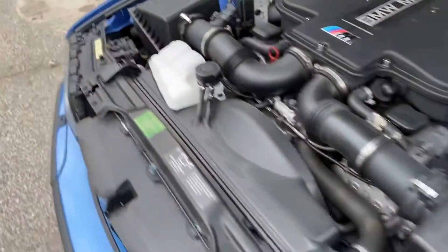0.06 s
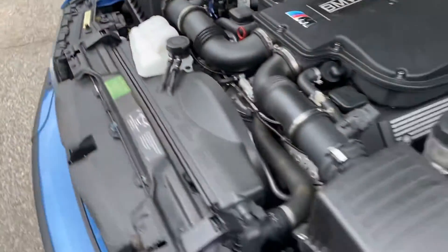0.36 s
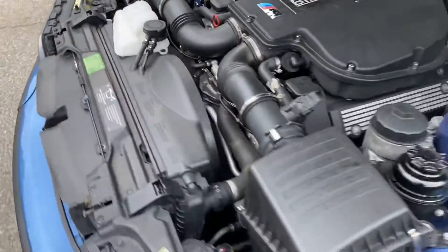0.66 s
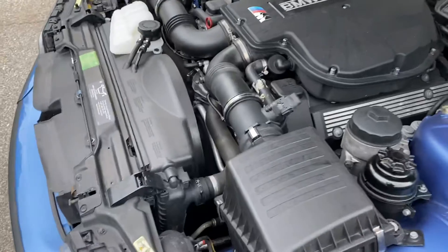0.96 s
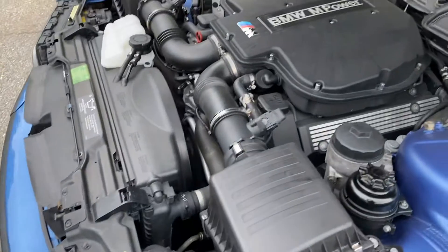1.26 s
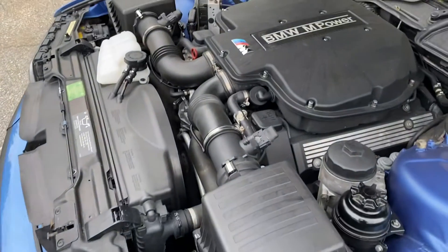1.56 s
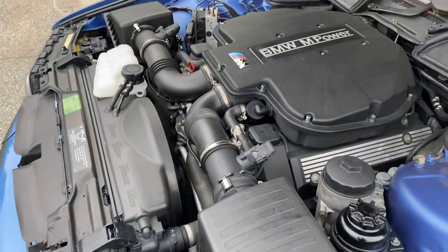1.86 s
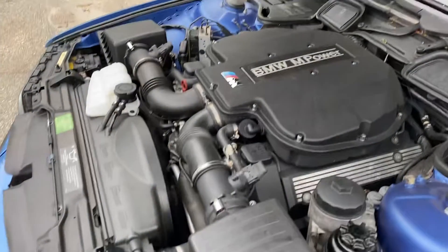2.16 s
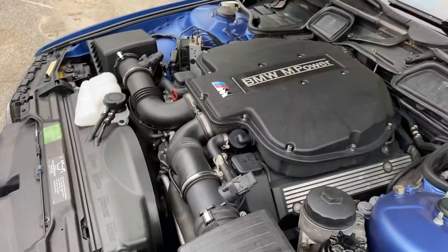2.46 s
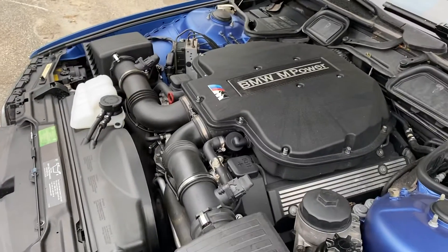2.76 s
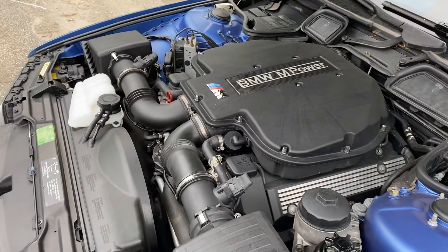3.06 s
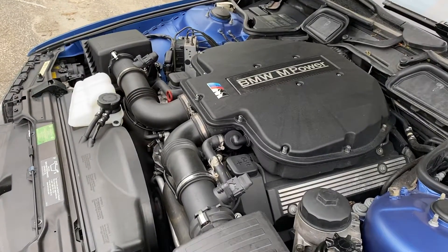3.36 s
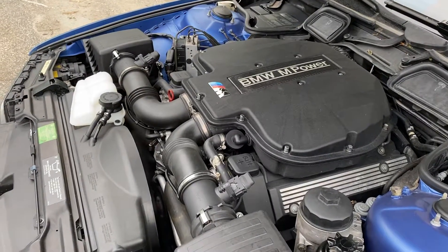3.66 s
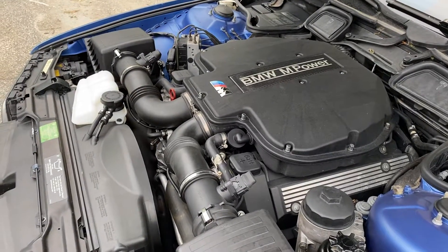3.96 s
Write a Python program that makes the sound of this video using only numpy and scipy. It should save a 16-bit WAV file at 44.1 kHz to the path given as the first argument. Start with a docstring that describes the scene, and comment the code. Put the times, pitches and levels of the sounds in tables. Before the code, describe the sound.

A car engine idles with an even, booming throb, light valve clatter and thin, high belt squeaks. The microphone starts near the rushing radiator fan, then drifts above the open engine bay, where the ticking comes forward slightly.

```python
"""A V8 engine idles under an open hood while the microphone drifts from the radiator to above the block.
The firing note booms and throbs; valve gear and injectors knock at set crank angles through block and
covers. Fan air and belt whirr fall back as the microphone moves away. A belt pulley squeaks high up
once a turn over a fluttering bearing hiss. Underneath, the timing chain whines faintly, an electric
accessory hums, and pipes and brackets ring with the shaking."""
import sys
import numpy as np
from scipy import signal
from scipy.fft import rfft, irfft
from scipy.io import wavfile

SR = 44100
rng = np.random.default_rng(int(sys.argv[2]) if len(sys.argv) > 2 else 0)


def persist_wave(psi):
    """Save psi, clipped to +-1, as 16-bit WAV."""
    counts = np.round(np.clip(psi, -1, 1) * 32767).astype(np.int16)
    wavfile.write(sys.argv[1], SR, np.atleast_2d(counts).T)


N = 176400
TIME = np.arange(N) / SR
FREQS = np.maximum(np.arange(N // 2 + 1) * SR / N, 1)

# Idle speed. Each row: time in seconds, firings per second.
FIRING_RATE = [(0.0, 73.93), (0.3, 73.27), (0.5, 74.1), (0.75, 75.41), (1.1, 73.82), (1.35, 73.6),
               (1.6, 72.56), (1.85, 74.16), (2.15, 74.79), (2.45, 74.4), (2.65, 74.56), (3.05, 74.2),
               (3.25, 73.45), (3.48, 72.33), (3.7, 74.27), (3.85, 74.99), (4.0, 74.49)]
# The microphone move. Each row: time in seconds, closeness to the radiator from 0 to 1.
AT_RADIATOR = [(0, 0.99), (.3, 0.81), (.7, 0.17), (1.1, 0.24), (1.6, 0.08), (4, 0.03)]
# Stereo image of the bay. Each row: frequency in Hz, left-right likeness from 0 to 1.
BAY_LIKENESS = [(30, 0.7), (150, 1), (350, 1), (700, 0.68), (1400, 0.52), (2000, 0.4), (4000, 0.3),
                (8000, 0.5), (15000, 0.8)]
# Body of the boom. Each row: multiple of the cycle rate, level in dB, change at the radiator in dB.
BOOM_ORDERS = [(8, -8, -4), (9, -34.5, -7), (10, -23, 5.5), (16, -25.5, 7.5)]
# Weak tones from unequal cylinders. Each row: multiple of the cycle rate, level in dB.
UNEVEN_ORDERS = [(5, -39.5), (6, -35.5), (11, -32.5), (12, -33.5), (13, -32.5), (14, -31.5), (15, -44.5),
                 (17, -41.5), (19, -42), (21, -38.5), (23, -40), (24, -36), (25, -45), (26, -40.5),
                 (27, -46), (29, -46), (32, -45.5), (35, -47.5), (37, -44.5), (39, -49), (45, -47),
                 (48, -44.5), (50, -48)]
# Each part's rhythm over one cycle. Each row: crank angle in degrees, relative strength in dB.
BLOCK_KNOCKS = [(20, -4), (52, 8.5), (155, -8), (245, 10.5), (285, -2), (302, 2), (332, 8), (385, -3),
                (430, -5), (472, -1), (490, 10), (565, 3), (600, 0.5), (655, 6), (708, 0.5)]
COVER_KNOCKS = [(10, -0.5), (46, 1.5), (68, -8), (135, -5), (195, 2), (265, -2), (305, -3.5), (436, 2.5),
                (485, -4.5), (528, -4), (570, -0.5), (622, -9), (658, -3.5), (688, 1)]
VALVE_KNOCKS = [(5, 1), (40, 2), (126, -12), (148, 4.5), (185, -15), (212, -2), (285, 0), (345, -4),
                (405, 5.5), (432, -5), (485, -2), (510, -18), (628, 3), (672, -10)]
INJECTOR_TICKS = [(15, -3), (88, 4), (108, 7), (130, 0), (178, 3), (230, -4), (285, 4), (315, -4),
                  (425, -6), (628, -6)]
# Tone colour of each noisy layer. Each row: frequency in Hz, relative level in dB.
BLOCK_EQ = [(110, -11), (170, -0.5), (235, -2.5), (275, -3.5), (345, -5), (400, -8), (450, -1.5),
            (510, -20), (700, -30)]
COVER_EQ = [(350, -24), (500, -1.5), (620, -3), (705, -2), (770, -2.5), (900, -3.5), (1050, -6.5),
            (1500, -36)]
VALVE_EQ = [(700, -3), (1000, -6.5), (1200, 1.5), (1320, -0.5), (1540, 1), (1650, -2), (1770, 0),
            (2000, -2), (2300, -4), (2800, -11.5), (4000, -24)]
INJECTOR_EQ = [(1800, -24), (2500, 2), (3300, 2), (4300, 2), (5100, -2.5), (5450, -3), (5780, -3.5),
               (6200, -3), (7060, -1), (7800, -14.5), (9500, -11.5), (15000, -10)]
FAN_EQ = [(14, 8), (45, -15), (150, 6.5), (260, -8), (340, 6), (430, 1), (520, -9.5), (850, -6),
          (1060, -10), (1260, 0), (1600, -13.5), (2120, -7.5), (2600, -13), (8000, -31.5)]
WHIRR_EQ = [(900, -27), (1010, -3.5), (1070, 0), (1130, -5), (1230, -40)]
PULLEY_EQ = [(7000, -31), (10000, -20), (10800, -2.5), (11400, 5), (12100, -4), (12900, -7), (14000, 2.5),
             (14700, -5), (15600, -8), (17000, -16)]
BEARING_EQ = [(4000, -7), (6900, -28), (7900, 1), (8450, 6), (9000, -10), (10000, -3.5), (11500, -8),
              (12600, -3.5), (14100, 5.5), (14800, 4.5), (15600, 4), (17000, -11)]
SIZZLE_EQ = [(13500, -29), (14700, -8), (15550, 0), (17000, -2)]
# Belt whirr and sizzle, loudest at the engine front. Each row: time in seconds, level in dB.
WHIRR_FADER = [(0, -41), (.3, -37.5), (.7, -40), (.95, -41), (1.3, -55), (1.7, -66), (4, -67)]
SIZZLE_FADER = [(0, -39), (.5, -33), (.8, -51), (4, -44)]
# Timing chain whine. Each row: multiple of the tooth rate, level in dB, change at the radiator in dB.
CHAIN_HARMONICS = [(1, -52.5, 4), (2, -45.5, -11), (3, -51, 9), (4, -50.5, 0), (5, -44, -9), (6, -50, 4)]
# Hum and whine of an electric accessory. Each row: pitch in Hz, level in dB.
ACCESSORY_TONES = [(301.5, -44.5), (602.9, -44.5), (1205.8, -53), (2110.3, -50)]
# Pipes and brackets. Each row: pitch in Hz, width in Hz, level in dB, change at the radiator in dB.
BRACKET_RINGS = [(677, 18, -48, -8), (709, 26, -44.5, -4.5), (821, 41, -49.5, -11), (1188, 62, -46, 4.5),
                 (1398, 28, -52.5, 3), (1526, 34, -46, -16), (1584, 42, -45, -23), (1740, 24, -49, -16),
                 (1825, 27, -46, -4), (1905, 20, -52.5, 5), (1962, 47, -46.5, -4), (2383, 30, -54.5, -2),
                 (3100, 110, -53.5, -13), (4850, 58, -57, 2), (5180, 97, -53.5, -5), (5740, 64, -55.5, -6),
                 (7010, 110, -59.5, 9), (7540, 100, -54, -4)]
# Louder squeaks of the belt on some turns, same shape as the rest. Each row: peak time in seconds, level in dB,
# pitch in Hz.
BELT_CHIRPS = [(.047, -27, 11450), (.121, -28.5, 11100), (.181, -26.5, 11500), (.334, -35, 12300),
               (.388, -34, 11100), (.465, -28.5, 11300), (.54, -34, 11000), (.596, -34, 11300),
               (.67, -30, 11400), (.743, -31, 11100), (.95, -30, 11300), (1.095, -36, 11900),
               (1.306, -31, 11400), (1.434, -33, 10800), (1.517, -35, 11400), (1.652, -32, 10900),
               (1.723, -29, 11300), (1.853, -33, 11200), (1.929, -30, 11300), (2.057, -32, 11500),
               (2.135, -31, 11400), (2.185, -33, 11400), (2.391, -33, 11400), (2.412, -33, 10900),
               (2.543, -33, 11300), (2.599, -34, 11400), (2.749, -35, 11500), (2.823, -33, 11500),
               (2.895, -35, 11600), (3.1, -33, 11500), (3.312, -34, 11300), (3.597, -28, 11480),
               (3.727, -36, 11200), (3.803, -30, 11800), (3.93, -33, 11000)]

CYLINDERS, CHAIN_TEETH = 8, 19
PULLEY_RATIO, BEARING_RATIO = .777, 2.879  # turns per crank turn
PULLEY_RUB_TURN, BEARING_RUB_TURN = .63, .55  # where in its turn each rubs hardest


def from_db(db):
    """Decibels to gain."""
    return 10 ** (np.asarray(db) / 20)


def unit_rms(x):
    """Scale to unit power."""
    return x / np.sqrt(np.mean(x ** 2) + 1e-20)


def automation(rows):
    """A control curve at every sample."""
    return np.interp(TIME, *np.transpose(rows))


def over_hz(points):
    """A curve read along log frequency."""
    hz, value = np.transpose(points)
    return np.interp(np.log(FREQS), np.log(hz), value)


def colour(x, eq):
    """Shape with an EQ curve that rolls off beyond its ends; unit power."""
    skirts = 1 / (1 + (eq[0][0] / FREQS) ** 2) / (1 + (FREQS / eq[-1][0] / 2) ** 2)
    return unit_rms(irfft(rfft(x) * from_db(over_hz(eq)) * skirts, N))


def drift(rate_hz):
    """A smooth random wobble of unit power, mostly slower than rate_hz."""
    spectrum = rfft(rng.standard_normal(N)) / (1 + (FREQS / rate_hz) ** 2)
    return unit_rms(irfft(spectrum * (FREQS > 1), N))


def pan(db):
    """Stereo gains; positive dB leans left."""
    return from_db(np.array([[.5], [-.5]]) * db)


def spread(mid, side):
    """The stereo image of the bay: tight in the bass, wider in the treble."""
    alike = over_hz(BAY_LIKENESS)
    centre = np.sqrt(1 + alike) * rfft(mid)
    edges = np.sqrt(1 - alike) * rfft(side) * np.array([[1], [-1]])
    return irfft(centre + edges, N)


def bay_noise():
    """Noise as wide as the engine bay."""
    return spread(*rng.standard_normal((2, N)))


def firing_boom(cycle, radiator, ripple_rad=.08, left_lag_rad=.22):
    """The firing note and its octave, throbbing neighbours, and wavering tones of unequal cylinders."""
    angle = 2 * np.pi * (cycle + 225 / 720)  # a lead of 225 crank degrees
    ripple = ripple_rad * np.sin(angle)  # the note hurries and lags once a cycle
    angle = angle + (ripple + left_lag_rad * np.array([[-.5], [.5]])) / CYLINDERS
    out = 0
    for order, db, change_db in BOOM_ORDERS:
        place = pan(-2.3 if order < 1.5 * CYLINDERS else 1.6)  # lows right, octave left
        out = out - place * from_db(db + change_db * radiator) * np.cos(order * angle)
    for order, db in UNEVEN_ORDERS:
        out = out + from_db(db + 1.57 * drift(2.2)) * np.cos(order * angle + 2 * np.pi * rng.random())
    return out


def knocks(cycle, pattern, eq, decay_s, wash, repeat, scatter_db):
    """Each contact sets off a short dense ring, partly the same every cycle, over a steady wash."""
    deg, db = np.transpose(pattern)
    hit_cycles = np.arange(-1, int(cycle[-1]) + 1)[:, None] + deg / 720
    starts = np.interp(hit_cycles, cycle, np.arange(N), left=-1, right=-1).astype(int)
    power = from_db(db + scatter_db * rng.standard_normal(hit_cycles.shape)) ** 2
    hits = np.bincount(starts[starts >= 0], power[starts >= 0], N)
    ringing = signal.lfilter([1], [1, -np.exp(-2 / (decay_s * SR))], hits)
    envelope = np.sqrt(ringing / ringing.mean() + wash)
    grains = rng.standard_normal((2, 4096))
    looped = np.array([unit_rms(np.interp(cycle % 1 * len(g), np.arange(len(g)), g)) for g in grains])
    texture = np.sqrt(repeat / 2) * looped + np.sqrt(1 - repeat) * rng.standard_normal((2, N))
    return colour(spread(*(texture * envelope)), eq)


def clatter(cycle, radiator):
    """Block, covers, valves and injectors knock; at the radiator the block comes forward in the mix."""
    block = knocks(cycle, BLOCK_KNOCKS, BLOCK_EQ, decay_s=.0081, wash=.22, repeat=.68, scatter_db=1.5)
    cover = knocks(cycle, COVER_KNOCKS, COVER_EQ, decay_s=.0043, wash=1, repeat=.3, scatter_db=.5)
    valves = knocks(cycle, VALVE_KNOCKS, VALVE_EQ, decay_s=.0069, wash=1.2, repeat=.2, scatter_db=.5)
    ticks = knocks(cycle, INJECTOR_TICKS, INJECTOR_EQ,
                   decay_s=.0063, wash=6.5, repeat=.18, scatter_db=2.5)
    block *= from_db(-37.5 + 2 * radiator)
    cover *= from_db(-34 - 3.5 * radiator)
    valves *= from_db(-35 - 3.7 * radiator)
    return pan(1) * (block + cover + valves) + pan(2) * from_db(-39) * ticks


def fan(radiator):
    """Air rushes through the radiator fan, louder close to it."""
    return from_db(-40.5 + 10.9 * radiator) * colour(bay_noise(), FAN_EQ)


def belt_whirr():
    """A narrow band of whirr from the belt drive, heard while the microphone passes the engine front."""
    return from_db(automation(WHIRR_FADER)) * colour(bay_noise(), WHIRR_EQ)


def from_belt(source, left_lag_s=.0001844):
    """Sound from the belt reaches the left microphone later."""
    return irfft(rfft(source) * np.exp(-2j * np.pi * FREQS * np.array([[left_lag_s], [0]])), N)


def slips(per_s=140, decay_s=.005, steady_rub=2.4):
    """Envelope of tiny random belt slips: each bites at once and dies away, over a steady rub."""
    starts = (rng.random(N) < per_s / SR) * rng.uniform(.2, 1, N)
    power = signal.lfilter([1], [1, -np.exp(-2 / (decay_s * SR))], starts + 1e-18)
    return np.sqrt(power / power.mean() + steady_rub)


def rub(eq, swell_db, grit_db, diffuse):
    """Gritty friction hiss from one spot, with a little of it scattered round the bay."""
    envelope = from_db(swell_db)
    friction = rng.standard_normal(N) * envelope * slips() * from_db(grit_db * drift(270))
    scattered = diffuse * unit_rms(envelope) * rng.standard_normal((2, N))
    return colour(unit_rms(from_belt(friction)) + scattered, eq)


def belt_hiss(crank, radiator):
    """The pulley rubs once a turn and the bearing flutters faster; three hisses ride both pulses."""
    turn = np.cos(2 * np.pi * (PULLEY_RATIO * crank - PULLEY_RUB_TURN))
    flutter = np.cos(2 * np.pi * (BEARING_RATIO * crank - BEARING_RUB_TURN))
    pulley = rub(PULLEY_EQ, 4.8 * turn + 2 * flutter + 2.5 * drift(27), grit_db=2.5, diffuse=.15)
    bearing = rub(BEARING_EQ, turn + 2 * flutter + 3.1 * drift(28), grit_db=0, diffuse=.2)
    sizzle = rub(SIZZLE_EQ, 1.8 * turn + 3.3 * flutter + 3 * drift(30), grit_db=.5, diffuse=.2)
    return (from_db(-44 + 4.3 * radiator) * pulley + from_db(-37.5) * bearing
            + from_db(automation(SIZZLE_FADER)) * sizzle)


def chain_whine(crank, radiator):
    """The timing chain sings at its tooth rate, each harmonic wavering on its own."""
    mesh = 2 * np.pi * CHAIN_TEETH * crank
    return sum(from_db(db + change_db * radiator + 3.5 * drift(7.8)) * np.sin(k * mesh + .63 * drift(14))
               for k, db, change_db in CHAIN_HARMONICS)


def accessory_hum():
    """An electric accessory hums and whines with a slight shimmer."""
    return sum(from_db(db + 1.9 * drift(4.9)) * np.sin(2 * np.pi * hz * TIME + .23 * drift(8.1))
               for hz, db in ACCESSORY_TONES)


def bracket_rings(radiator):
    """The shaking sets pipes and brackets ringing in narrow bands."""
    shaking = rfft(bay_noise())
    out = 0
    for hz, width_hz, db, change_db in BRACKET_RINGS:
        ring = irfft(shaking / (1 + ((FREQS - hz) / width_hz * 2) ** 2), N)
        out = out + from_db(db + change_db * radiator) * unit_rms(ring)
    return out


def pulley_squeaks(crank, attack_s=.00235, release_s=.00517, width_hz=400):
    """One short rough squeak each pulley turn; on some turns a louder squeak, with its own time and pitch,
    takes its place."""
    pulley = PULLEY_RATIO * crank
    chirp_turns = np.round(np.interp(np.transpose(BELT_CHIRPS)[0], TIME, pulley) - PULLEY_RUB_TURN)
    soft = []
    for turn in range(int(pulley[-1])):
        if turn not in chirp_turns:
            rub_s = np.interp(turn + PULLEY_RUB_TURN, pulley, TIME)
            soft.append((rng.normal(rub_s, .007), rng.normal(-41, 1), rng.normal(12000, 300)))
    t = np.arange(-1024, 2048) / SR
    envelope = np.exp(-.5 * (t / np.where(t < 0, attack_s, release_s)) ** 2)
    out = np.zeros(N)
    for peak_s, db, hz in [*BELT_CHIRPS, *soft]:
        rough_phase = np.cumsum(rng.standard_normal(len(t))) * np.sqrt(2 * np.pi * width_hz / SR)
        where = np.clip(int(peak_s * SR) + np.round(t * SR).astype(int), 0, N - 1)
        out[where] += from_db(db) * envelope * np.sin(2 * np.pi * hz * t + rough_phase)
    low_cut = signal.butter(2, 9500, "high", fs=SR, output="sos")
    return from_belt(signal.sosfilt(low_cut, out))


def scene():
    """Mix the bay: the crank sets the rhythm, the microphone move shifts the balance."""
    cycle = np.cumsum(automation(FIRING_RATE)) / SR / CYLINDERS
    crank = 2 * cycle  # two turns to a cycle
    radiator = automation(AT_RADIATOR)
    return (firing_boom(cycle, radiator) + clatter(cycle, radiator) + fan(radiator)
            + belt_whirr() + belt_hiss(crank, radiator) + chain_whine(crank, radiator)
            + accessory_hum() + bracket_rings(radiator) + pulley_squeaks(crank))


def record(dry):
    """A steep high cut takes off the very top."""
    cutoff_hz = 15720
    return signal.sosfilt(signal.ellip(10, .1, 80, cutoff_hz, fs=SR, output="sos"), dry)


dry = scene()
out = record(dry)
persist_wave(out)
```